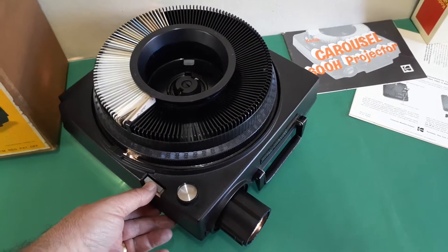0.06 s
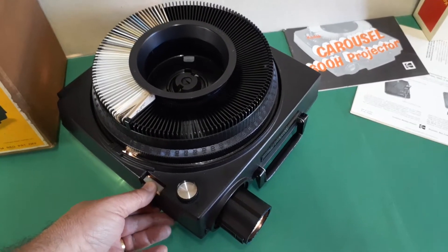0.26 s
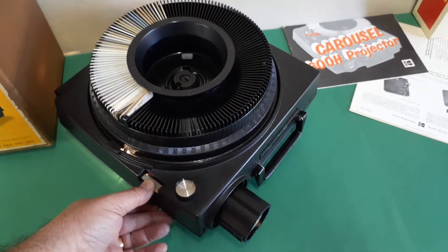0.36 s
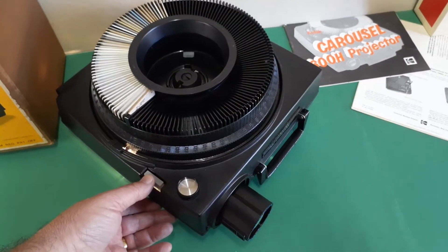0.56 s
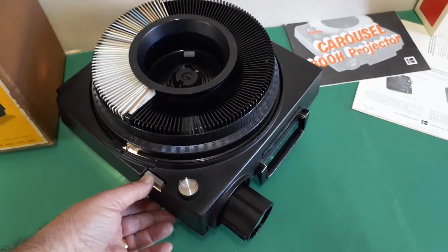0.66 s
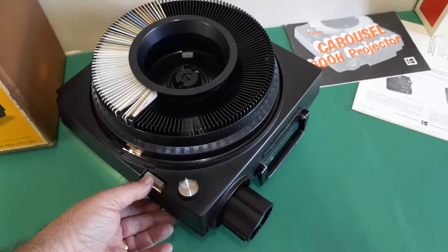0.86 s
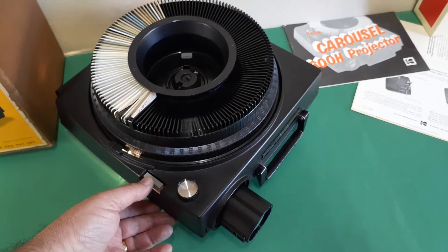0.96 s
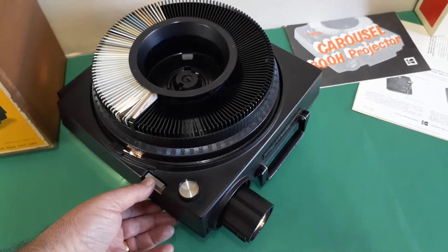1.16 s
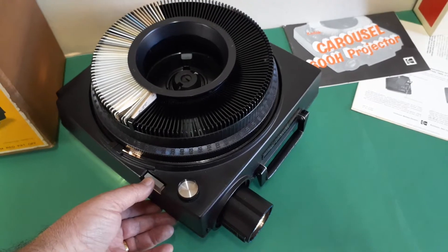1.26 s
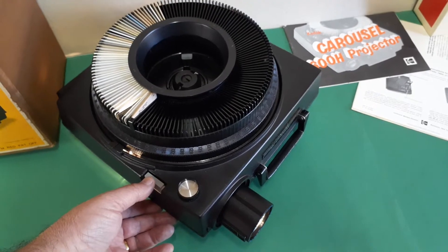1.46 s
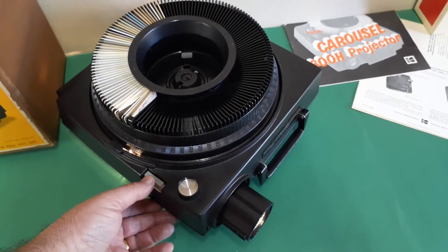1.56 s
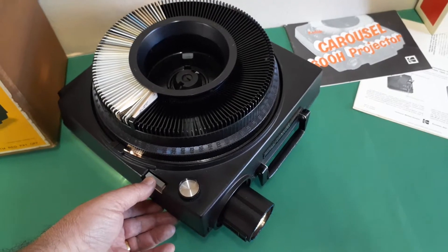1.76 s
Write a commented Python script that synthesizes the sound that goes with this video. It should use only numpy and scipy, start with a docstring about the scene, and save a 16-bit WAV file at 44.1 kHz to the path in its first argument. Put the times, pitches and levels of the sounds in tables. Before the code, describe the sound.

A slide projector changes one slide, heard close in a small room over its steady fan and motor hum. A button knocks at about 0.2 seconds. From 0.4 to 0.7 seconds gears chatter, levers click and the slide scrapes up. The tray clunks forward near 0.85 seconds, and sharp metallic snaps follow around 1 second. After a last knock near 1.15 seconds, only the hum remains.

```python
"""A small room, a slide projector on a table, heard close up on a stereo pair of microphones.
One slide changes: the button knocks, the drive engages, levers click and the old slide scrapes up;
the tray jolts one step with a clunk, the next slide drops and the gate snaps shut.
Fan and motor hum on underneath, and the room gives the moving parts a short tail."""
import sys
import numpy as np
from scipy import signal
from scipy.fft import rfft, irfft, next_fast_len
from scipy.io import wavfile
from scipy.ndimage import map_coordinates

SR = 44100
rng = np.random.default_rng(int(sys.argv[2]) if len(sys.argv) > 2 else 0)


def transcribe(signal):
    """Save signal, clipped to [-1, 1], as a 16-bit WAV file at the path in sys.argv[1]."""
    frames = np.atleast_2d(signal).T
    limited = np.clip(frames, -1, 1)
    pcm = np.round(limited * 32767).astype(np.int16)
    wavfile.write(sys.argv[1], SR, pcm)


N = 79380


def amp(db):
    """Decibels to gain."""
    return 10 ** (np.asarray(db) / 20)


def unit(x):
    """Scale to rms 1."""
    return x / np.sqrt(np.mean(x ** 2) + 1e-20)


def along(points, hz):
    """Read (Hz, value) points on a log axis."""
    f, v = np.transpose(points)
    return np.interp(np.log(hz + 1), np.log(f + 1), v)


def wobble(rate, size):
    """A smooth random curve, rate knots a second."""
    return map_coordinates(rng.standard_normal(4096), [np.arange(size) * rate / SR], mode="wrap")


def sides(pan_db):
    """Microphone gains of constant total power; pan is left over right."""
    g = amp(np.array([pan_db, -pan_db]) / 2).reshape(2, -1)
    return g / np.sqrt(np.mean(g ** 2, axis=0))


def fade(t, t60):
    """Decay by 60 dB in t60 seconds."""
    return np.exp(-np.log(1000) * t / max(t60, 1e-3))


def onset(t, attack_s):
    """A soft start."""
    return 1 - np.exp(-(t / attack_s) ** 2)


def add(track, s, sound):
    """Mix a sound in at s seconds."""
    part = track[:, round(s * SR):][:, :sound.shape[1]]
    part += sound[:, :part.shape[1]]


# The moving parts at the microphones. Each row: frequency in Hz, left-right likeness from 0 to 1.
PARTS_ALIKE = [(100, 0.94), (400, 0.96), (1000, 0.69), (2500, 0.64), (5000, 0.26), (12000, 0)]
# They sit mostly to the right. Each row: frequency in Hz, pan in dB.
PARTS_PAN = [(100, -2.5), (280, -1.5), (500, 2.5), (1000, -5), (2000, -4), (4000, -10.5), (8000, -10),
             (13000, -4)]

def noise(spectrum, size, tilt=0, alike=PARTS_ALIKE, pan=PARTS_PAN):
    """Coloured stereo noise of rms 1, tilted in dB per octave above 550 Hz."""
    hz = np.fft.rfftfreq(size, 1 / SR)
    mid, side = rfft(rng.standard_normal((2, size)))
    spread = np.arccos(np.clip(along(alike, hz), -1, 1)) / 2
    mid, side = np.cos(spread) * mid, np.sin(spread) * side
    pair = np.array([mid + side, mid - side]) * sides(along(pan, hz))
    colour_db = along(spectrum, hz) + tilt * np.log2(np.maximum(hz / 550, 1))
    return unit(irfft(pair * amp(colour_db), size))


def ring(modes, t, scatter_db=2):
    """Damped modes; the higher ones reach the two microphones out of step."""
    out = np.zeros((2, len(t)))
    for hz, db, t60 in modes:
        apart = np.arccos(np.clip(along(PARTS_ALIKE, hz), -1, 1)) * rng.choice([-1, 1])
        phase = rng.uniform(0, 2 * np.pi) + np.array([[0], [apart]])
        gains = amp(db + scatter_db * rng.normal()) * sides(along(PARTS_PAN, hz))
        out += gains * fade(t, t60) * np.sin(2 * np.pi * hz * t + phase)
    return out


# The struck housing. Each row: frequency in Hz, relative density in dB.
HOUSING_SPECTRUM = [(25, -55), (150, -3.5), (400, 2), (620, -8), (850, -5), (1150, -2), (1550, 1),
                    (2100, -1.5), (2700, 2), (3200, -29), (4500, -8.5), (7000, -13.5), (11000, -26),
                    (16000, -23)]
# Its modes. Each row: frequency in Hz, relative level in dB, t60 in seconds.
HOUSING_MODES = [(431.4, -14.5, 0.35), (802, -15, 0.18), (1528, -11.5, 0.11), (1800, -27, 0.28),
                 (2040, -12.5, 0.13), (2575, -41, 0.24), (2920, -42, .14), (5330, -47, .12)]
# Levers striking it. Each row: start in seconds, housing level in dB, noise t60 in seconds,
# lever pitch in Hz, lever level in dB, lever t60 in seconds.
KNOCKS = [(0.2377, -24.5, 0.031, 2590, -35.5, 0.17), (0.4314, -40, 0.082, 1750, -33, 0.065),
          (.4555, -38, 0.033, 2230, -24.5, 0.041), (.5426, -35, 0.049, 765, -28, 0.025),
          (0.5875, -34, 0.034, 1610, -37, 0.065), (.597, -30, 0.094, 1080, -35, 0.059),
          (.605, -29, 0.098, 2296, -31.5, 0.072), (.6125, -37, 0.079, 1843, -26.5, 0.053),
          (0.6507, -35, .05, 1680, -31, 0.039), (.6635, -33.5, 0.024, 4350, -40, 0.059),
          (.6982, -33.5, 0.033, 1222, -33.5, 0.056), (.722, -31.5, 0.046, 2190, -44, 0.055),
          (.8315, -24.5, .05, 2920, -29, .06), (0.847, -21.5, 0.02, 1530, -25, 0.037),
          (.859, -26.5, 0.068, 510, -24, 0.061), (.872, -25.5, 0.03, 1400, -54, 0.051),
          (0.94, -36, 0.017, 1800, -26, 0.033), (.988, -34.5, 0.13, 2100, -34.5, 0.042),
          (1.032, -37.5, 0.085, 2210, -40, 0.046), (1.0505, -30.5, 0.095, 2740, -18, .03),
          (1.1102, -32, 0.067, 3910, -44, 0.11), (1.1565, -28.5, 0.027, 1730, -24, 0.025)]

def knocks():
    """Each lever rings briefly in a pair of modes and sets the housing ringing."""
    out, t = np.zeros((2, N)), np.arange(SR // 3) / SR
    for s, db, t60, hz, lever_db, lever_t60 in KNOCKS:
        body = noise(HOUSING_SPECTRUM, len(t)) * fade(t, t60) + ring(HOUSING_MODES, t)
        lever = ring([(hz, 0, lever_t60), (hz * 0.882, -6, lever_t60)], t)
        add(out, s, onset(t, attack_s=0.0008) * (amp(db) * body + amp(lever_db) * lever))
    return out


# Metal on metal. Each row: frequency in Hz, relative density in dB.
METAL_SPECTRUM = [(30, -79), (500, -40), (2000, -4), (3300, -5), (4600, 4.5), (6500, -2), (8000, -4),
                  (10000, 3), (11500, 4), (13000, -2), (15800, -7)]
# Its ring. Each row: frequency in Hz, relative level in dB, t60 in seconds.
METAL_MODES = [(5170, -44, 0.087), (10540, -17, 0.056), (11100, -21, 0.13), (10680, -30, 0.058),
               (13960, -38, 0.093)]
# Catches snapping. Each row: start in seconds, level in dB, t60 in seconds,
# tilt in dB per octave, pan offset in dB.
CLICKS = [(.172, -46.5, 0.043, -4, -15), (0.3629, -29, 0.046, -2, -12), (0.4094, -33, 0.083, -5.5, -8),
          (0.431, -33, 0.099, -2, -7), (.4852, -24, 0.043, 16, -7), (.5426, -29.5, 0.034, -3, -6),
          (0.6, -35, 0.044, -2, -13), (0.6633, -21, 0.038, -3, -5), (.6982, -31, 0.02, -12, 2),
          (0.808, -35, 0.085, 1, -2), (0.8181, -30.5, 0.061, -8.5, -6), (0.831, -22.5, 0.034, -1.5, -9),
          (0.849, -45, 0.017, 1, 5), (0.9623, -30.5, 0.071, -1.5, -3), (0.9869, -10.5, .028, 2, -6),
          (0.9882, -12, 0.044, 6.5, -7), (1.0489, -17, 0.035, 5, -9), (1.0528, -22, .025, -4.5, 0),
          (1.1108, -29, 0.065, 0, -8), (1.119, -34, .06, 1, -2), (1.154, -42, 0.076, 14, 0)]

def clicks():
    """Bright, quickly damped metal contacts with a faint ring."""
    out, t = np.zeros((2, N)), np.arange(SR // 3) / SR
    for s, db, t60, tilt, pan_db in CLICKS:
        pan = [(4000, pan_db - 8), (9000, pan_db - 2.5), (12000, pan_db + 0.5)]
        crack = noise(METAL_SPECTRUM, len(t), tilt, pan=pan) * fade(t, t60)
        add(out, s, amp(db) * onset(t, attack_s=0.0011) * (crack + ring(METAL_MODES, t)))
    return out


# Sliding friction. Each row: frequency in Hz, relative density in dB.
RUB_SPECTRUM = [(60, -60), (300, -12), (900, 0.5), (2200, 4), (3200, 1), (4500, 2), (7500, -8.5),
                (10500, -5), (13000, -14), (15800, -18)]
# Strokes. Each row: start, rise and release t60 in seconds, level in dB, tilt in dB per octave.
SCRAPES = [(.44, 0.05, 0.24, -33, -0.5), (.478, 0.03, 0.084, -27.5, 7), (.585, 0.015, 0.24, -37.5, 7),
           (.67, 0.038, 0.38, -39, 1), (.83, 0.0081, 0.17, -23.5, 0.5), (.995, 0.01, 0.65, -38.5, -1.5),
           (1.115, 0.032, .1, -39.5, -1.5)]

def scrapes(grain_db=2.5, grain_rate=400):
    """Slide and tray rub in their guides: grainy friction that swells and lets go."""
    out, t = np.zeros((2, N)), np.arange(SR // 3) / SR
    for s, rise, t60, db, tilt in SCRAPES:
        grains = unit(noise(RUB_SPECTRUM, len(t), tilt) * amp(grain_db * wobble(grain_rate, len(t))))
        swell = np.minimum(t / rise, 1) * fade(np.maximum(t - rise, 0), t60)
        add(out, s, amp(db) * grains * swell)
    return out


# Clunks in the chassis. Each row: start in seconds, level in dB, pitch in Hz, t60 in seconds.
THUDS = [(.245, -35, 460.3, .4), (0.556, -29, 398, 0.2), (.655, -32, 165.1, 0.33), (0.853, -25, 352, 0.11),
         (0.856, -20, 461, 0.054), (0.859, -31, 260, 0.15), (0.861, -39.5, 75, 0.61),
         (1.149, -31, 336, 0.07)]

def thuds(wander_rad=0.59):
    """Heavy parts come to rest and stir low, slightly rattling resonances of the chassis."""
    out, t = np.zeros((2, N)), np.arange(SR // 2) / SR
    for s, db, hz, t60 in THUDS:
        tone = np.sin(2 * np.pi * hz * t + wander_rad * wobble(0.068 * hz, len(t)))
        envelope = onset(t, attack_s=0.0035) * fade(t, t60)
        add(out, s, amp(db) * sides(along(PARTS_PAN, hz)) * tone * envelope)
    return out


# Gear chatter and chassis rumble. Each row: frequency in Hz, relative density in dB.
CHATTER_SPECTRUM = [(30, -60), (200, -3), (300, -0.5), (440, 5), (620, -6), (1200, -6), (2400, -11.5),
                    (3300, -19.5), (5000, -18), (7500, -30.5), (11000, -21.5), (16000, -40)]
RUMBLE_SPECTRUM = [(20, -60), (50, -20), (76, 5.5), (105, -10), (162, 7), (195, 3), (250, -14.5),
                   (600, -32), (3000, -80)]
# Load on the gear. Each row: time in seconds, chatter level in dB, rumble level in dB.
GEAR_LOAD = [(.2, -53.5, -79), (.28, -43.5, -60), (.36, -43, -51), (.41, -39.5, -51.5), (.5, -36.5, -51),
             (.62, -38.5, -42.5), (.69, -40.5, -41), (.77, -47.5, -49.5), (.9, -39, -51.5),
             (1.0, -44.5, -52), (1.06, -44, -52), (1.17, -38, -48), (1.23, -51, -59), (1.35, -69, -84)]

def gear(rough_db=1.5):
    """The cam train chatters for one cycle and shakes the chassis as it pushes the tray."""
    s, *levels = np.transpose(GEAR_LOAD)
    chatter_db, rumble_db = [np.interp(np.arange(N) / SR, s, db) for db in levels]
    chatter = unit(noise(CHATTER_SPECTRUM, N) * amp(rough_db * wobble(150, N)))
    return amp(chatter_db) * chatter + amp(rumble_db) * noise(RUMBLE_SPECTRUM, N)


# Rushing air. Each row: frequency in Hz, relative density in dB.
AIR_SPECTRUM = [(15, -75), (25, -41), (59, -17), (91, -28), (104, -4), (140, -25), (174, -5.5),
                (205, -12.5), (225, -20.5), (265, -6), (299, -18), (361, -3.5), (420, -8), (480, -6),
                (620, -12), (780, -6), (920, -13), (1220, -13), (1470, -15), (2390, -17.5), (3100, -25.5),
                (4600, -25.5), (7420, -33), (11100, -25.5), (13500, -39), (15800, -44)]
# The air at the microphones. Each row: frequency in Hz, left-right likeness from 0 to 1.
AIR_ALIKE = [(60, 1), (130, 0.64), (290, 0.93), (640, .8), (1400, 0.42), (3100, 0.084), (12000, 0.078)]
# The fan's treble favours the right microphone. Each row: frequency in Hz, pan in dB.
FAN_PAN = [(110, -3), (250, 1), (700, -1), (1290, -6.5), (2400, -7.5), (4400, -15), (9000, -11)]
# Motor and blade tones. Each row: frequency in Hz, rms level in dB, unsteadiness from 0 to 1.
HUM = [(120, -52, 0), (163, -47.5, 0.11), (240.5, -48.5, 0.2), (362.1, -50, 0.14), (405.4, -51, 0.84),
       (752, -61, 0.9), (1043, -58.5, 0.7), (1198, -65, .4)]

def fan(air_db=-43.5):
    """The fan moves a steady rush of air under wavering motor and blade tones."""
    t = np.arange(N) / SR
    out = amp(air_db) * noise(AIR_SPECTRUM, N, alike=AIR_ALIKE, pan=FAN_PAN)
    for hz, db, unsteady in HUM:
        swing = 1 + unsteady * (wobble(14, N) + 1j * wobble(14, N)) / np.sqrt(2)
        tone = np.real(swing * np.exp(2j * np.pi * (hz * t + rng.random())))
        out += amp(db) * unit(tone) * sides(along(FAN_PAN, hz))
    return out


# The room around the table. Each row: frequency in Hz, t60 in seconds.
ROOM_DECAY = [(150, 0.28), (2000, 0.28), (12000, 0.33)]

def room(x, level_db=-8.5):
    """The walls return a short diffuse tail to each microphone."""
    hz, t, bands = signal.stft(rng.standard_normal((2, SR // 2)), SR, nperseg=256)
    decay = np.exp(-np.log(1000) * t / along(ROOM_DECAY, hz)[:, None])
    tail = signal.istft(bands * decay, SR, nperseg=256)[1]
    tail *= onset(np.arange(tail.shape[1]) / SR, attack_s=0.0058)
    return amp(level_db) * signal.fftconvolve(x, tail / np.linalg.norm(tail[0]), axes=1)[:, :N]


def scene():
    """The changing mechanism in its room, over the fan."""
    parts = knocks() + clicks() + scrapes() + thuds()
    return parts + room(parts) + gear() + fan()


def record(dry):
    """The left microphone is a little nearer and hears the projector first; the top is cut off."""
    left_lead_s, top_hz = 0.00008, 16000
    size = next_fast_len(N + SR // 2)
    hz = np.fft.rfftfreq(size, 1 / SR)
    lead = np.exp(1j * np.pi * hz * left_lead_s * np.array([[1], [-1]]))
    low_pass = 1 / (1 + (hz / top_hz) ** 160)
    return irfft(rfft(dry, size) * lead * low_pass, size)[:, :N]


dry = scene()
out = record(dry)
transcribe(out)
```